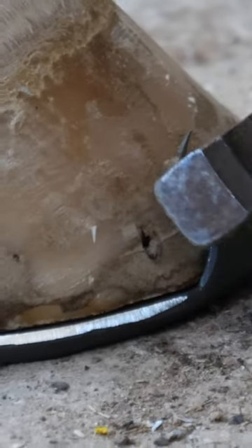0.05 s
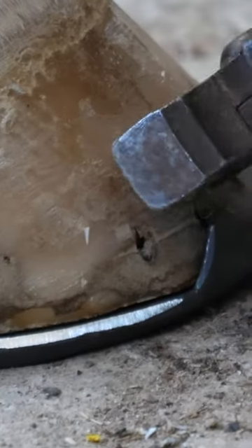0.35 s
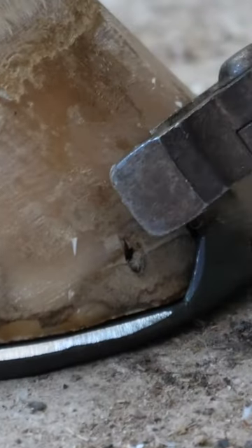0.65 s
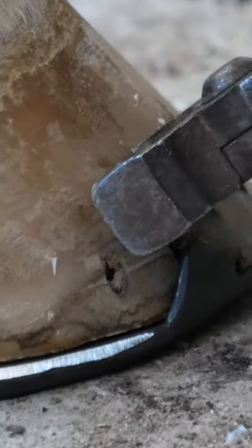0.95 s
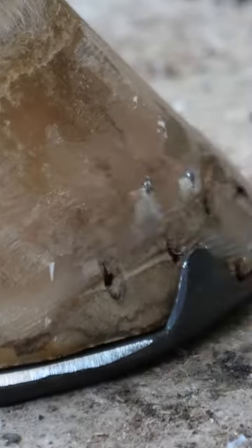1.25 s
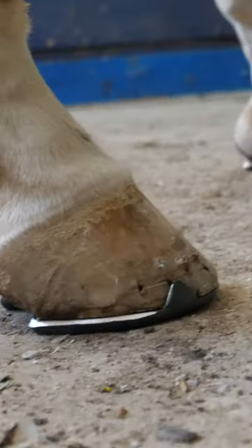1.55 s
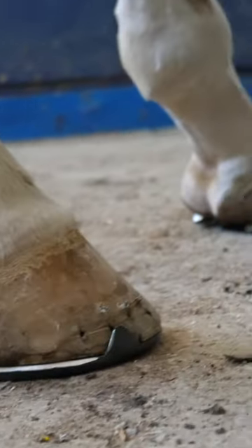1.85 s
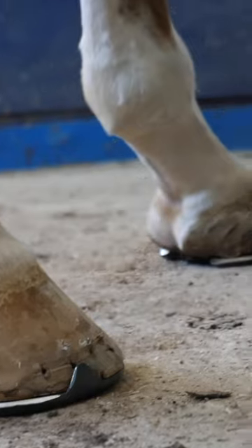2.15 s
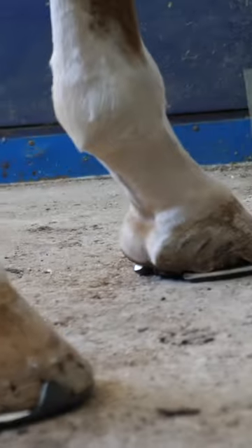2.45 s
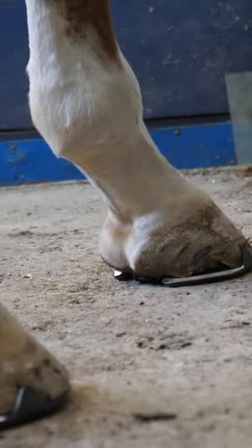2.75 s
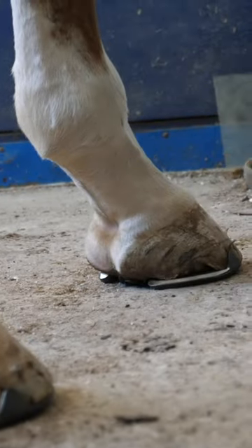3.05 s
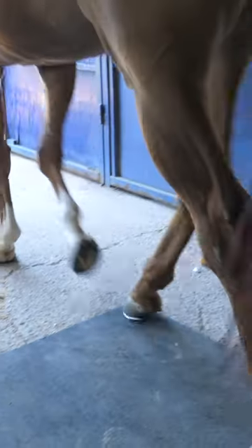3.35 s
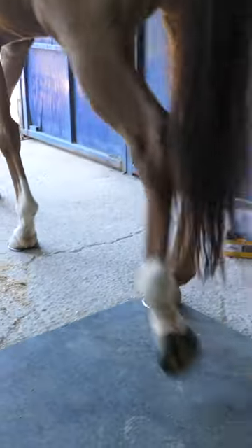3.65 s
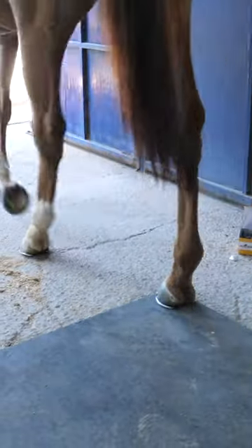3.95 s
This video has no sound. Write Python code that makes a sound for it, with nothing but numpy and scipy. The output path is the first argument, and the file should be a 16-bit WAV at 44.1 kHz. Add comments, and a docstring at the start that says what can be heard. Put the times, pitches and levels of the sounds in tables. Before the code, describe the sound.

A farrier's metal tool rubs and rings against a shod hoof, with a close, sharp nail snap and a brief squeak. The horse then stamps, scuffs and clops on gritty concrete and a rubber mat in a slightly echoing stable.

```python
"""A farrier works on a shod hoof in a hard-walled stable. Over faint air and soft shuffling, friction
rings a steel tool in strokes. About a second in, close by, the tongs snap a nail over, click free and
squeak by stick-slip. A hollow hoof knocks; then the tool scrapes and rings again as iron shoes stamp
on gritty concrete. Last, shoes drag, hooves scuff and clop dully on a rubber mat, and iron strikes
the concrete again."""
import sys
import numpy as np
from scipy import signal
from scipy.fft import rfft, irfft
from scipy.io import wavfile
from scipy.ndimage import uniform_filter1d

SR = 44100
rng = np.random.default_rng(int(sys.argv[2]) if len(sys.argv) > 2 else 0)


def digitize_waveform(pressure):
    """Quantize a signal to 16-bit integers and store it at the path in sys.argv[1].

    Rows of a 2-D input are taken as channels; values are limited to [-1, 1].
    """
    field = np.atleast_2d(pressure).T
    bounded = np.clip(field, -1, 1)
    quanta = np.round(bounded * 32767).astype(np.int16)
    wavfile.write(sys.argv[1], SR, quanta)


N = 176400
HZ = np.fft.rfftfreq(16384, 1 / SR)


def amp(db):
    """Decibels to amplitude ratio."""
    return 10 ** (np.asarray(db) / 20)


def curve(points, hz=HZ):
    """Interpolation along a logarithmic frequency axis."""
    knots_hz, values = np.transpose(points)
    return np.interp(np.log(hz + 1), np.log(knots_hz + 1), values)


def clock(length_s):
    """Sample times in seconds."""
    return np.arange(max(int(length_s * SR), 2)) / SR


def add(mix, start_s, sound):
    """Superposition: a sound joins the mix at its start time."""
    part = mix[max(round(start_s * SR), 0):][:len(sound)]
    part += sound[:len(part)]


def colour(x, spectrum_db):
    """Minimum-phase filtering at unit energy: only the spectrum's shape counts."""
    log_gain = np.log(amp(np.concatenate([spectrum_db, spectrum_db[-2:0:-1]])))
    response = np.exp(np.conj(signal.hilbert(log_gain)))
    taps = np.fft.ifft(response).real[:len(HZ)]
    return signal.fftconvolve(x, taps / np.linalg.norm(taps))[:N]


def resonances(modes, floor_db=0):
    """Lorentzian peaks (centre_hz, width_hz, level_db) summed in power over a floor, in dB."""
    power = sum(amp(db) ** 2 / (1 + (2 * (HZ - hz) / width) ** 2) for hz, width, db in modes)
    return 10 * np.log10(amp(floor_db) ** 2 + power)


def ring(modes, length_s):
    """Free vibration: each mode (pitch_hz, level_db, t60_s) is a damped sine."""
    t = clock(length_s)
    return sum(amp(db) * np.exp(-np.log(1000) * t / t60) * np.sin(2 * np.pi * hz * t)
               for hz, db, t60 in modes)


def grit(n, grain_db, size=24):
    """Dense tiny fractures: noise in grains of log-normal strength."""
    noise = rng.standard_normal(n)
    noise *= amp(grain_db * np.repeat(rng.standard_normal(n // size + 1), size)[:n])
    return noise / noise.std()


def friction(length_s, db, change_db, rise_s, fall_s, grain_db):
    """Sliding friction: noise follows a force that bites, changes evenly in dB and lets go."""
    t = clock(length_s + 6 * fall_s)
    bite = np.sin(np.pi / 2 * np.minimum(t / rise_s, 1)) ** 2
    release = np.exp(-np.maximum(t - length_s, 0) / fall_s)
    return bite * release * amp(db + change_db * np.minimum(t / length_s, 1)) * grit(len(t), grain_db)


def impact(db, decay_s, rise_s):
    """Contact noise: a crunch with a linear rise and exponential decay."""
    t = clock(8 * decay_s + rise_s)
    envelope = np.minimum(t / rise_s, 1) * np.exp(-np.maximum(t - rise_s, 0) / decay_s)
    return amp(db) * envelope * grit(len(t), grain_db=3)


# Reverberation time of the stable: frequency_hz, t60_s
STABLE_DECAY = [(450, 1.0), (1100, 0.84), (7000, 0.55), (15000, 0.17)]
def reverb(x):
    """Reverberation: hard walls return early reflections and a diffuse tail whose treble dies first."""
    hz, t, noise = signal.stft(rng.standard_normal(SR), SR, nperseg=256)
    decay = np.exp(-np.log(1000) * t / curve(STABLE_DECAY, hz)[:, None])
    tail = signal.istft(noise * decay, SR)[1]
    tail *= np.minimum(np.arange(len(tail)) / SR / 0.0028, 1)
    tail /= np.linalg.norm(tail)
    for delay_s, gain in [(.0035, 0.18), (.0098, 0.36), (.0182, .28)]:
        add(tail, delay_s, np.array([gain]))
    return signal.fftconvolve(x, tail / np.linalg.norm(tail))[:N]


def in_room(x, room_db):
    """Direct and reverberant fields share a fixed power; room_db is reverberant over direct."""
    return (x + amp(room_db) * reverb(x)) / np.hypot(1, amp(room_db))


def drags(rows, spectrum_db, room_db, rise_s, fall_s, grain_db):
    """Source and filter: friction along the ground, coloured by the surfaces."""
    out = np.zeros(N)
    for start_s, length_s, db, change_db in rows:
        add(out, start_s, friction(length_s, db, change_db, rise_s, fall_s, grain_db))
    return in_room(colour(out, spectrum_db), room_db)


# Background spectrum: frequency_hz, relative_db
AIR_SPECTRUM = [(20, -5.5), (100, -7.5), (450, -7), (3000, -20), (8000, -29.5), (15800, -44.5)]
def air(level_db=-50):
    """Stationary noise: a faint background, strongest in the bass."""
    gain = amp(curve(AIR_SPECTRUM, np.fft.rfftfreq(N, 1 / SR)))
    noise = irfft(rfft(rng.standard_normal(N)) * gain, N)
    return amp(level_db) * noise / noise.std()


# Movements about the stable: start_s, length_s, level_db, change_db
SHUFFLES = [(0, 0.13, -52.5, 1), (.235, 0.057, -44, -3), (.56, 0.088, -45, -3.5), (1.18, 0.14, -49, 14),
            (1.50, 0.08, -38, -5), (2.915, 0.28, -58.5, 13)]
# Their spectrum: frequency_hz, relative_db
SHUFFLE_SPECTRUM = [(60, -15.5), (350, -4.5), (1400, -8.5), (15000, -34.5)]
def shuffling():
    """Light friction on the floor makes soft, dull noise."""
    return drags(SHUFFLES, curve(SHUFFLE_SPECTRUM), room_db=-5, rise_s=0.006, fall_s=0.013, grain_db=2.5)


def chatter(n, contacts=3, jumps_per_s=90):
    """A Poisson process moves the touch between contact points; each gets an on-off gate."""
    jumps = np.cumsum(rng.random(n) < jumps_per_s / SR)
    return [jumps % contacts == k for k in range(contacts)]


# Tool strokes: start_s, length_s, level_db, change_db, contact_place (0 to 1)
STROKES = [(0.28, 0.053, -43, 7.5, 0.35), (.364, 0.048, -26, -4, 0.3), (0.644, 0.067, -19.5, -2.5, 0.45),
           (0.753, 0.089, -20.5, -11, 0.2), (0.873, 0.049, -18, -2.5, 0), (0.92, 0.042, -21.5, -16, .05),
           (1.92, 0.062, -38, 3.5, 0.07), (2.229, 0.056, -32, 9, 0.8), (2.268, 0.061, -13.5, -4.5, 0.84),
           (2.333, 0.12, -21.5, 0.5, 0.54), (2.442, 0.063, -14.5, -10, 1),
           (2.475, 0.075, -24.5, -6.5, 0.83)]
# Steel modes over the rubbing noise: pitch_hz, place_0_db, place_1_db
STEEL_MODES = [(1985, 8, 11), (3215, 8, 10), (3730, 7, 11), (4480, 8, 14), (4650, 9, 11), (5385, 3, 24),
               (5605, 11, 23), (5832, 8, 24), (6100, 14, 20), (6570, 13, 19), (7080, 17, 18),
               (7730, 16, 21), (7970, 16, 21), (8370, 20, 21), (9330, 18, 22), (9543, 14, 25),
               (9974, 19, 17), (10370, 18, 27), (12400, 12, 24), (13120, 11, 18), (14900, 9, 21),
               (15540, 14, 19)]
# Rubbing noise: frequency_hz, relative_db
RUB_SPECTRUM = [(150, -24.5), (1200, -4.5), (1750, -3), (3600, 1.5), (5500, -0.5), (7500, -5.5),
                (11400, -13), (16000, -11)]
def steel_tool(width_hz=47.6, detune_hz=28, rise_s=0.014):
    """Forced vibration: friction drives modes that each contact weights and detunes; place 1 is in tune."""
    strokes = np.zeros(N)
    for start_s, length_s, db, change_db, place in STROKES:
        drive = friction(length_s, db, change_db, rise_s, fall_s=0.0082, grain_db=3.5)
        for gate in chatter(len(drive)):
            modes = []
            for hz, place_0_db, place_1_db in STEEL_MODES:
                uneven_db, detune = rng.standard_normal(2)
                mode_db = place_0_db + place * (place_1_db - place_0_db) + uneven_db
                modes.append((hz + detune_hz * (1 - place) * detune, width_hz, mode_db))
            # A crowd of weaker modes ripples the floor in 50 Hz steps.
            crowd_db = 4.5 * np.interp(HZ / 50, np.arange(len(HZ)), rng.standard_normal(len(HZ)))
            add(strokes, start_s, colour(drive * gate, curve(RUB_SPECTRUM) + resonances(modes, crowd_db)))
    out = in_room(strokes, room_db=0)
    # Once, the lowest mode rings free.
    ping = ring([(1988, -26, .45)], .5) * np.minimum(clock(.5) / rise_s, 1)
    add(out, 2.295, ping)
    return out


# Modes rung by the snap: pitch_hz, level_db, t60_s
NAIL_MODES = [(200, -30, 0.06), (560, -30, 0.015), (1834, -18, 0.029), (2710, -9.5, 0.02),
              (2990, -4, 0.011), (4170, -10, 0.013), (5310, -9.5, 0.014)]
def nail_snap(start_s=1.0458):
    """Sudden release of stress: the nail gives way with a tick and a heavily damped ring."""
    out = np.zeros(N)
    nail = ring(NAIL_MODES, .1)
    scattering = impact(db=-39, decay_s=0.022, rise_s=.006)  # off the nearby leg and floor
    add(out, start_s, nail)
    add(out, start_s, signal.fftconvolve(nail, scattering))
    add(out, start_s, impact(db=-11.5, decay_s=0.00068, rise_s=.0001))
    low_cut = signal.butter(2, 141, "high", fs=SR, output="sos")  # a low cut thins the bass under the snap
    return in_room(signal.sosfilt(low_cut, out), room_db=-15.5)


# Clicks of the jaws: start_s, level_db, decay_s
JAW_CLICKS = [(1.2889, -13.5, 0.0041), (1.295, -26.5, 0.011), (1.329, -33, 0.0022), (1.357, -30.5, 0.0048),
              (1.7903, -34, 0.0025)]
# Their spectrum: frequency_hz, relative_db
JAW_SPECTRUM = [(60, -37), (220, -5), (1800, 2.5), (2500, -6), (3500, -1), (7700, 2), (9000, -3),
                (10800, -20), (14300, -3), (15800, -34)]
# Resonances of the squeak: centre_hz, width_hz, level_db
SQUEAK_MODES = [(1630, 49, 5.2), (2390, 76, 21.4), (3070, 220, 11.6)]
# Its rubbing noise: frequency_hz, relative_db
SQUEAK_SPECTRUM = [(50, -10), (150, 4), (2500, -5), (6000, -11), (15000, -27)]
def tongs(squeak_s=1.313, slips_per_s=49.4, slip_fall_db=-9.5):
    """Stick-slip friction: the jaws click free, then squeak as each slip bites and dies away."""
    clicks, slips = np.zeros((2, N))
    for start_s, db, decay_s in JAW_CLICKS:
        add(clicks, start_s, impact(db, decay_s, rise_s=0.0014))
    drive = friction(length_s=0.16, db=-24, change_db=-6, rise_s=0.0041, fall_s=0.014, grain_db=2)
    wander = 3 * uniform_filter1d(rng.standard_normal(len(drive)), size=600)
    slip_phase = np.cumsum(slips_per_s * (1 + wander)) / SR % 1
    add(slips, squeak_s, drive * amp(slip_fall_db * slip_phase))
    jaws = colour(clicks, curve(JAW_SPECTRUM))
    squeak = colour(slips, curve(SQUEAK_SPECTRUM) + resonances(SQUEAK_MODES))
    return in_room(jaws, room_db=-11) + in_room(squeak, room_db=-14.5)


# Hoof blows on mat and floor, and a quick echo of the loudest clop:
# start_s, level_db, pitch_hz, t60_s, room_db
KNOCKS = [(1.486, -37.5, 176.3, 0.9, -14), (1.549, -20, 600, 0.028, -18), (2.658, -27, 360.4, 0.16, -6.5),
          (2.952, -14, 140, 0.016, -6.5), (2.973, -27.5, 437, 0.029, -6), (3.418, -12.5, 477, 0.017, -10),
          (3.4531, 4, 453, 0.022, -17), (3.471, -20, 440, 0.03, -20)]
# Modes of a hoof: pitch_ratio, relative_db, t60_ratio
HOOF_MODES = [(1, 1, 0.84), (1.36, -12.5, 1), (2.05, -9, 0.62)]
def hoof_knocks():
    """Damped resonance: a padded blow rings the hollow hoof, which radiates in a band near its pitch."""
    direct, to_room = np.zeros((2, N))
    for start_s, db, pitch_hz, t60_s, room_db in KNOCKS:
        modes = [(pitch_hz * ratio, mode_db, t60_s * share) for ratio, mode_db, share in HOOF_MODES]
        band = signal.butter(2, [0.81 * pitch_hz, 2.2 * pitch_hz], "band", fs=SR, output="sos")
        knock = signal.sosfilt(band, ring(modes, .5))
        add(knock, 0, impact(db=-37, decay_s=0.00084, rise_s=0.00033))
        add(direct, start_s, amp(db) * knock)
        add(to_room, start_s, amp(db + room_db) * knock)
    return direct + reverb(to_room)


def shoe_strikes(rows, spectrum_db, room_db, rise_s):
    """Impact noise: iron crushes grit on concrete, each blow with its own tilt above about 800 Hz."""
    out = np.zeros(N)
    octaves = np.log2(1 + HZ / 800)
    for start_s, db, decay_s, tilt in rows:
        add(out, start_s, colour(impact(db, decay_s, rise_s), spectrum_db + tilt * octaves))
    return in_room(out, room_db)


# Steps on concrete: start_s, level_db, decay_s, tilt_db_per_octave
STEPS = [(1.548, -25, 0.0048, -15.5), (1.6995, -31.5, 0.0018, -6), (3.415, -23.5, 0.017, -12.5),
         (3.699, -21, 0.027, -1), (3.7085, -12, 0.0035, -3.5), (3.7238, -10, 0.008, -1),
         (3.932, -38, 0.019, 5)]
# Their spectrum: frequency_hz, relative_db
STEP_SPECTRUM = [(80, -20), (400, -6), (700, -3.5), (1100, 0.5), (1700, -5), (2250, -1.5), (5000, -10.5),
                 (11000, -26), (15800, -29.5)]
def shoe_steps():
    """Hard contact: iron meets concrete with an abrupt onset."""
    return shoe_strikes(STEPS, curve(STEP_SPECTRUM), room_db=-6, rise_s=0.00067)


# Stamps with a slower onset: start_s, level_db, decay_s, tilt_db_per_octave
STAMPS = [(1.991, -10.5, 0.035, -1), (2.02, -19, 0.11, -0.5), (2.135, -20.5, 0.072, -7.5),
          (2.392, -26.5, 0.053, 1.5), (2.624, -25, 0.013, -2.5), (2.651, -25.5, 0.006, -4.5)]
# Their spectrum: frequency_hz, relative_db
STAMP_SPECTRUM = [(60, -28), (150, -15), (360, -17.5), (640, -2), (950, 0.5), (1800, -6.5), (3200, -13),
                  (6900, -13), (7500, -25), (8050, -15.5), (8600, -28.5), (15800, -54)]
def shoe_stamps():
    """Impacts of iron on concrete with a slower onset, heard as crunches."""
    return shoe_strikes(STAMPS, curve(STAMP_SPECTRUM), room_db=-7, rise_s=0.011)


# Slides on grit: start_s, length_s, level_db, change_db
SLIDES = [(2.635, 0.12, -28.5, -6), (3.08, 0.066, -44, -2.5), (3.408, 0.017, -27, -9.5),
          (3.49, 0.026, -38.5, -4.5)]
# Their rubbing noise: frequency_hz, relative_db
SLIDE_SPECTRUM = [(200, -13.5), (2200, -9.5), (3300, -8.5), (6200, -4.5), (10000, -15.5), (15800, -27)]
# Resonances of an iron shoe: centre_hz, width_hz, level_db
SHOE_MODES = [(2850, 120, 8), (3330, 115, 12.5), (4640, 80, 6.5)]
def shoe_slides():
    """Rough friction: grit sliding under a shoe excites the iron's resonances."""
    spectrum_db = curve(SLIDE_SPECTRUM) + resonances(SHOE_MODES)
    return drags(SLIDES, spectrum_db, room_db=-1, rise_s=0.022, fall_s=0.015, grain_db=6.5)


# Scuffs on the mat: start_s, length_s, level_db, change_db
SCUFFS = [(3.236, 0.046, -26.5, -3), (3.285, 0.11, -32, -2)]
# Their spectrum: frequency_hz, relative_db
SCUFF_SPECTRUM = [(59, -47), (100, -12.5), (330, -9), (687, -17.5), (944, -1), (1240, -16), (2400, -15),
                  (15800, -47.5)]
def mat_scuffs():
    """Friction of hoof on rubber: smooth noise with little treble."""
    return drags(SCUFFS, curve(SCUFF_SPECTRUM), room_db=-11, rise_s=0.0042, fall_s=0.012, grain_db=1)


def scene():
    """Superposition at one point, the same in both channels."""
    tools = steel_tool() + nail_snap() + tongs()
    hooves = shoe_stamps() + shoe_steps() + hoof_knocks()
    ground = mat_scuffs() + shoe_slides() + shuffling()
    return np.tile(tools + hooves + ground + air(), (2, 1))


def record(dry, edge_hz=15900):
    """Hard clipping of peaks above full scale, then a low-pass band limit."""
    low_pass = signal.firwin(511, edge_hz, window=("kaiser", 9), fs=SR)
    return signal.oaconvolve(np.clip(dry, -1, 1), low_pass[None], "same")


dry = scene()
out = record(dry)
digitize_waveform(out)
```